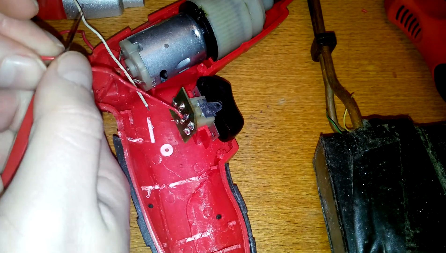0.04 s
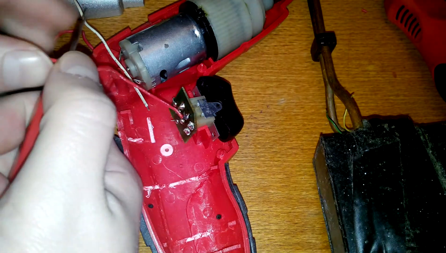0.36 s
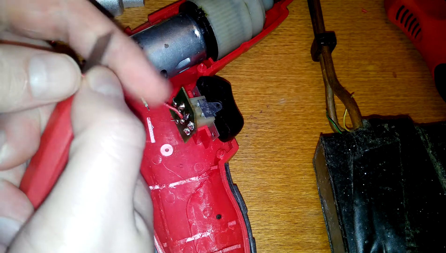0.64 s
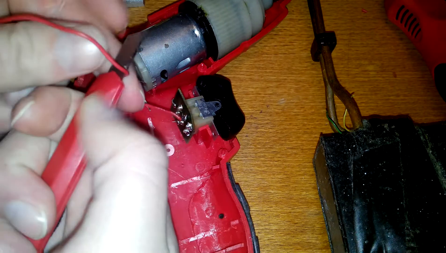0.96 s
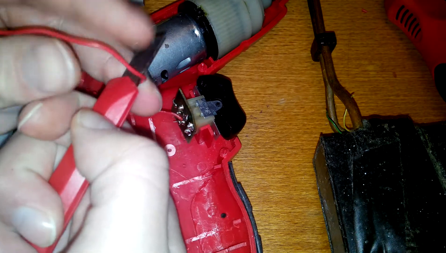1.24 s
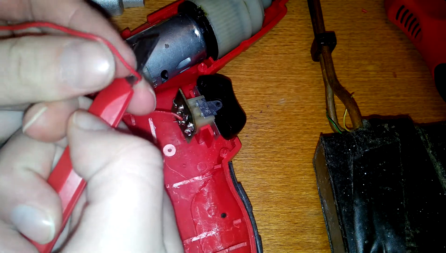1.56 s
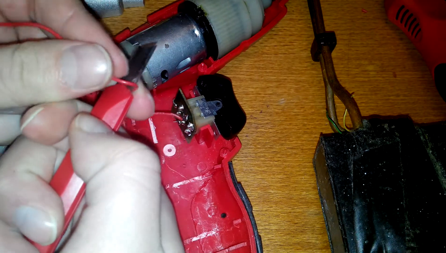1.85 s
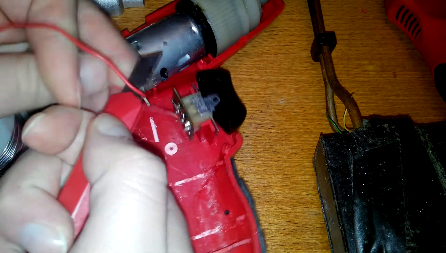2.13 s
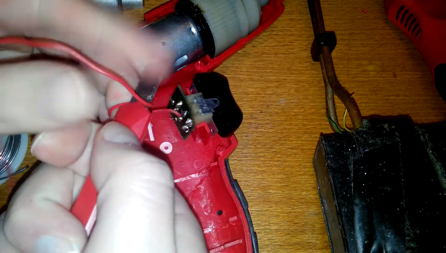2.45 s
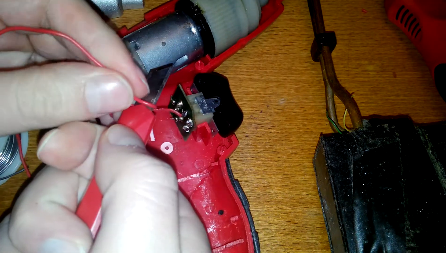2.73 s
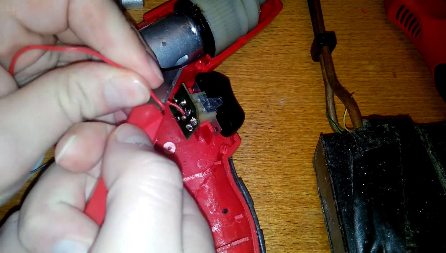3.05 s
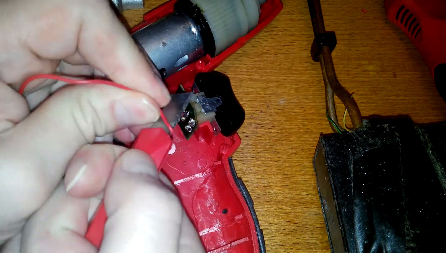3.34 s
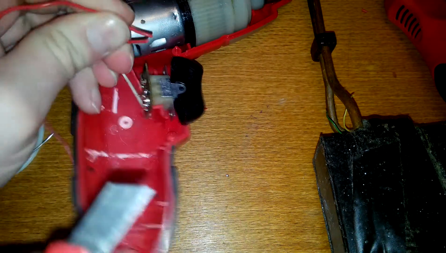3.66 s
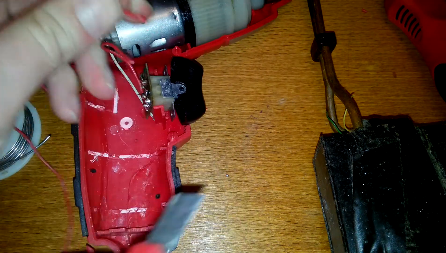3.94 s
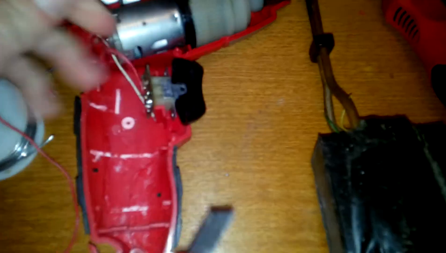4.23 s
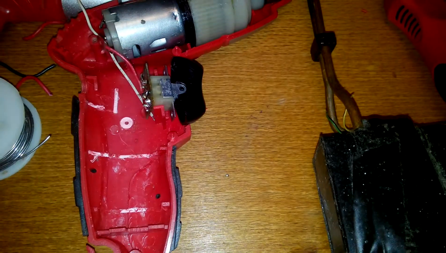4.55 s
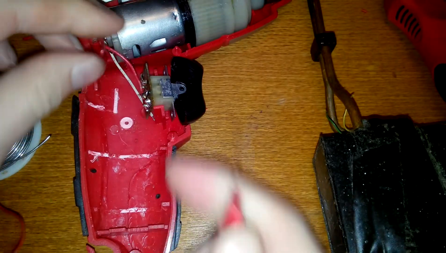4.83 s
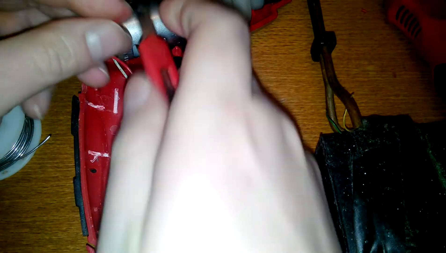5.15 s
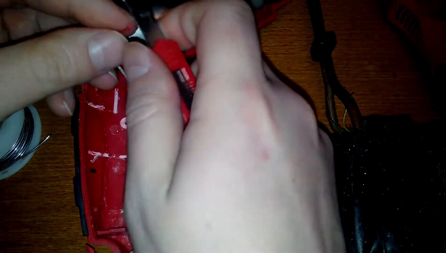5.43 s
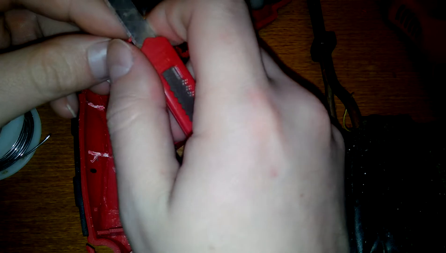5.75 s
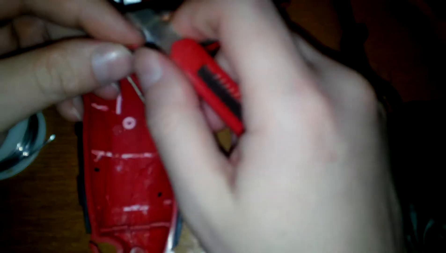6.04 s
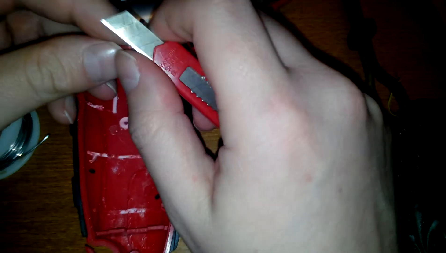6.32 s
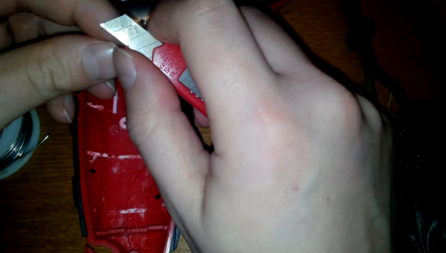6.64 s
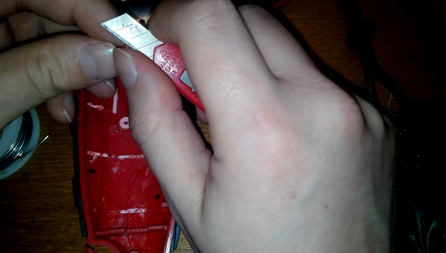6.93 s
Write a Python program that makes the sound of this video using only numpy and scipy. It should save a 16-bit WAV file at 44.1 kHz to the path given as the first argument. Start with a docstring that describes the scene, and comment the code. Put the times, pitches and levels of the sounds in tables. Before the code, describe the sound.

Thin wires and a plastic knife click faintly between fingers, with a sharp snap, hollow plastic knocks on wood and a brief blade scrape.

```python
"""Thin wires rub and tick faintly between fingers, over the soft hiss of a close microphone.
A plastic utility knife, nails and wires click over the open shell of a drill, which knocks on a wooden
table in a small quiet room. The blade snaps through a wire's insulation and the shell rocks.
At the end the blade scrapes along a wire. Hits are noise bursts plus damped modes; friction is tiny slips."""
import sys
import numpy as np
from scipy import signal
from scipy.fft import rfft, irfft
from scipy.io import wavfile

SR = 44100
rng = np.random.default_rng(int(sys.argv[2]) if len(sys.argv) > 2 else 0)


def wav_record(signal):
    """Record a signal, one row per channel, as 16-bit PCM in the file named by sys.argv[1]."""
    frames = np.transpose(np.atleast_2d(signal))
    bounded = np.clip(frames, -1, 1)
    # unit amplitude maps onto the largest positive 16-bit level
    quanta = np.round(bounded * 32767).astype(np.int16)
    wavfile.write(sys.argv[1], SR, quanta)


N = 316770
T = np.arange(8192) / SR  # time axis of one hit
HZ = np.fft.rfftfreq(len(T), 1 / SR) + 1

# wires sliding through fingers: start_s, length_s, level_db, tilt_db_per_octave
WIRE_SLIDES = [(0.312, 0.13, -71.5, -3), (1.013, 0.17, -67.5, -2), (2.186, 0.1, -56.5, -3),
               (2.34, 0.1, -73, -7), (3.36, 0.21, -77.5, -4.5), (3.633, 0.12, -48.5, -13),
               (3.784, .08, -66, -9.5), (4.003, 0.074, -67.5, 7.5), (4.237, 0.042, -66.5, -9.5),
               (4.455, 0.071, -64.5, 1.5), (4.683, 0.058, -58, 13.5), (4.846, 0.04, -63.5, -13),
               (5.252, 0.097, -69.5, -3.5), (5.591, 0.07, -73, -2)]
# spectrum of small parts touching: freq_hz, gain_db
CONTACT_SPECTRUM = [(100, -11.5), (250, -2), (900, -10), (1500, -2), (2300, 2), (4500, -1.5), (7000, -7.5),
                    (16000, -11.5)]


def amp(db):
    """Decibels to gain."""
    return 10 ** (np.asarray(db) / 20)


def unit(x):
    """Scale to unit energy."""
    return x / np.sqrt(np.sum(x ** 2) + 1e-30)


def lookup(points, hz):
    """Interpolate a table over log frequency."""
    freq_hz, value = np.transpose(points)
    return np.interp(np.log(hz + 1), np.log(freq_hz), value)


def add(mix, start_s, sound):
    """Mix in place at start_s."""
    part = mix[round(start_s * SR):][:len(sound)]
    part += sound[:len(part)]


def colour(x, gain_db):
    """Minimum-phase filter, gain_db over HZ: attacks stay sharp."""
    log_gain = np.log(amp(np.concatenate([gain_db, gain_db[-2:0:-1]])))
    response = np.exp(np.conj(signal.hilbert(log_gain)))
    taps = np.fft.ifft(response).real[:len(T) // 2]
    return signal.fftconvolve(x, taps)[:len(x)]


def tilt(db_per_octave):
    """Treble slope in dB: zero at 3 kHz, flat below 1 kHz."""
    return db_per_octave * np.log2(np.maximum(HZ, 1000) / 3000)


def decay(t60_s):
    """Envelope falling 60 dB in t60_s."""
    return np.exp(-np.log(1000) * T / max(t60_s, 1e-3))


def ring(modes, stretch=1):
    """Damped sines of a struck body; stretch scales the decay times."""
    return unit(sum(amp(db) * decay(t60_s * stretch) * np.sin(2 * np.pi * hz * T)
                    for hz, db, t60_s in modes))


def clatter(t60_s, tick_db, rise_s=0.00027):
    """Contact impulse, then modes too dense to resolve."""
    dense_modes = rng.standard_normal(len(T)) * decay(t60_s) * (1 - np.exp(-T / rise_s))
    return amp(tick_db) * (T == 0) + unit(dense_modes)


def at_level(hit, level_db):
    """Give a hit the energy of 5 ms at level_db."""
    return amp(level_db) * np.sqrt(.005 * SR) * unit(hit)


def slips(samples, rate_per_s, spread_db, rush_db):
    """Friction at unit rms: tiny uneven slips over a smooth rush."""
    sizes = amp(spread_db * np.minimum(rng.exponential(1, samples), 4))
    grains = sizes * rng.choice([-1, 1], samples) * (rng.random(samples) < rate_per_s / SR)
    rush = amp(rush_db) * unit(rng.standard_normal(samples))
    return np.sqrt(samples) * unit(unit(grains) + rush)


def hiss(rms_db=-70):
    """Steady noise of room and microphone."""
    # noise spectrum: freq_hz, relative_density_db
    density = [(15, -38.5), (25, -20.5), (107, -3.5), (141, -3.5), (291, -4), (361, -5), (587, -6),
               (905, -9), (981, -9.5), (2730, -13.5), (4570, -15.5), (6310, -19.5), (7830, -33.5),
               (13400, -32.5), (15800, -36.5)]
    gain = amp(lookup(density, np.fft.rfftfreq(N, 1 / SR)))
    noise = irfft(rfft(rng.standard_normal(N)) * gain, N)
    return amp(rms_db) * np.sqrt(N) * unit(noise)


def wire_rubs(peak_hz=3000, peak_db=4):
    """Insulation drags over skin and plastic in short swelling strokes."""
    out = np.zeros(N)
    body_db = lookup(CONTACT_SPECTRUM, HZ) + peak_db * np.exp(-(2 * np.log2(HZ / peak_hz)) ** 2)
    for start_s, length_s, level_db, slope in WIRE_SLIDES:
        samples = round(length_s * SR)
        friction = slips(samples, rate_per_s=4000, spread_db=6, rush_db=-7)
        rub = np.sqrt(samples) * unit(colour(friction, body_db + tilt(slope)))
        swell = np.sqrt(np.hanning(samples))
        add(out, start_s, amp(level_db) * rub * swell)
    return out


def click(pitch_hz, ring_db, slope, ring_t60_s=0.012, rise_s=0.0005):
    """Small parts touch: quick clatter, fainter tail, two modes damped by the grip."""
    strike = clatter(t60_s=.022, tick_db=-6.5) + amp(-7) * clatter(t60_s=.067, tick_db=-21)
    bass_cut_db = -9 / (1 + (1.36 * HZ / pitch_hz) ** 10)  # weak radiation below the first mode
    contact = unit(colour(strike, lookup(CONTACT_SPECTRUM, HZ) + tilt(slope) + bass_cut_db))
    modes = [(pitch_hz, 0, ring_t60_s), (pitch_hz * 1.3, -1, ring_t60_s * 0.39)]
    return contact + amp(ring_db) * unit(ring(modes) * (1 - np.exp(-T / rise_s)))


def finger_ticks(centre_hz=3095, spread_octaves=.4, spread_db=2.5, catch_every_s=.028):
    """Faint random ticks as fingers regrip and sliding wires catch, firmest in mid-span."""
    # start_s, length_s, level_db, tilt_db_per_octave, count
    regrip = (2.3, 4.7, -68, -2.5, 8)
    catches = [(start_s, length_s, level_db + 2, slope, int(length_s / catch_every_s))
               for start_s, length_s, level_db, slope in WIRE_SLIDES]
    out = np.zeros(N)
    for start_s, length_s, level_db, slope, count in [regrip] + catches:
        for k, (jitter, detune, force) in enumerate(rng.uniform(-0.9, 1, (count, 3))):
            progress = (k + .5 + .5 * jitter) / count
            tick = click(centre_hz * 2 ** (spread_octaves * detune), ring_db=-7, slope=slope)
            tick = at_level(tick, level_db + spread_db * force)
            add(out, start_s + length_s * progress, np.sin(np.pi * progress) * tick)
    return out


def handling_clicks():
    """Distinct contacts of knife, nails and wires; the grip shifts their pitch."""
    # contacts: start_s, level_db, pitch_hz, ring_over_clatter_db, tilt_db_per_octave
    contacts = [ (0.874, -65.5, 2470, -14, -3), (1.088, -61, 4320, 0, -7), (1.114, -61.5, 3900, 2, -6),
                (1.125, -60, 1700, -6, -3), (1.203, -57.5, 2250, -7, 2.5), (2.0875, -53.5, 3580, -1, 0),
                (2.186, -41, 2670, 4, -0.5), (2.2046, -53, 2640, 2, -3), (2.2533, -42.5, 3250, 1.5, 0),
                (2.3237, -53, 2280, -11, -3), (2.4208, -47, 2520, 15, -15), (2.4332, -36.5, 2380, 4, -9.5),
                (2.4405, -54, 2370, -2, 3), (2.740, -53, 2500, -2, -4.5), (2.847, -62.5, 2960, 3, -7),
                (2.864, -64, 2500, -1, -7), (3.108, -50, 1810, -2, -8), (3.1164, -43, 2340, 5, -4.5),
                (3.3768, -58, 2100, -5, 2.5), (3.4024, -59, 2080, -3, -0.5), (3.45, -59, 2500, -3, -7),
                (3.4804, -59, 2330, -3, -16), (3.4888, -59.5, 3600, -12, -4.5),
                (3.5564, -57.5, 2400, -6, -17), (3.587, -52, 2280, 9, -13), (3.6815, -36, 3700, -10, -3),
                (3.7255, -28.5, 2220, -1.5, -10.5), (3.7402, -36, 2240, -13, -1.5),
                (3.791, -50.5, 2096, -5, 9), (3.8925, -61, 2490, 0, -4), (4.249, -49.5, 1670, -23, 12.5),
                (4.5313, -58.5, 3510, -20, 1), (4.6857, -51.5, 1560, -5.5, 6.5),
                (4.701, -46, 3900, -16.5, 14.5), (4.8213, -61, 905, -1, -11),
                (4.8521, -53.5, 3800, -5, 4.5), (4.891, -62, 3020, -17, 1.5), (5.082, -64, 4500, -16, 0),
                (5.096, -59.5, 3290, -21, -5), (5.162, -56, 2070, 2, -8), (5.191, -49, 2080, -7.5, 11.5),
                (5.3097, -54.5, 2770, -24, 0.5), (5.3452, -53, 2020, -9, 4), (5.4343, -50.5, 2050, 6, -1.5),
                (5.482, -64.5, 2060, 10, -5), (5.555, -47.5, 3000, -8, -7), (6.0332, -42.5, 3980, -17, 9.5),
                (6.053, -44.5, 2360, -2, 6), (6.06, -43.5, 4900, -15, 6), (6.143, -42, 2050, 8, 4),
                (6.1615, -49.5, 2340, -6, 4), (6.189, -52, 2520, -8, 0)]
    out = np.zeros(N)
    for start_s, level_db, pitch_hz, ring_db, slope in contacts:
        add(out, start_s, at_level(click(pitch_hz, ring_db, slope), level_db))
    return out


def shell_knocks(ring_db=2.5, lift_octaves=0.14, full_blow_db=-21, db_per_doubling=43.5):
    """Hollow shell on wood: heavy blows reach low modes, hard ones high; the spot hit lifts one."""
    # blows: start_s, level_db, low_cut_hz, high_cut_hz, lift_hz, lift_db
    blows = [(2.2694, -52.5, 170, 1800, 830, 6), (2.4208, -27, 404, 1590, 412, 2),
             (3.5085, -38, 129, 440, 302, 18), (3.5150, -40, 129.5, 380, 565, 15),
             (3.629, -40, 132, 380, 196, 8), (3.6814, -23.5, 165.5, 750, 569, 13),
             (3.71, -34.5, 149, 600, 288, 13), (3.7247, -21.5, 250, 3200, 1218, 9.5),
             (3.7545, -38, 240, 500, 440, 14), (5.5537, -43, 910, 4000, 1240, 11.5),
             (6.038, -45.5, 697, 3500, 980, 12), (6.1393, -43, 220, 2600, 520, 1)]
    # shell resonances: freq_hz, gain_db, base_t60_s
    shell_modes = [(122, -11.5, 0.091), (193.5, -6, 0.11), (280, -12.5, .09), (388.6, -1.5, 0.13),
                   (418.5, 3.5, 0.076), (520, -4, 0.085), (597, -3.5, 0.047), (668, 2.5, 0.042),
                   (743, 1, 0.055), (810, -5, 0.032), (865, 4, 0.047), (980, -13, 0.11),
                   (1090, -12.5, 0.059), (1240, -2.5, 0.052), (1425, -15.5, 0.052), (1700, -4, 0.04),
                   (1973, -26.5, 0.02), (2280, -5.5, .045)]
    # spectrum of the shell's dense modes: freq_hz, gain_db
    shell_spectrum = [(50, -20.5), (150, 2), (400, -10.5), (1000, 4), (1600, -3), (2300, -3), (4000, -7),
                      (7000, -10.5), (16000, -22)]
    out = np.zeros(N)
    for start_s, level_db, low_hz, high_hz, lift_hz, lift_db in blows:
        # stronger blows free the shell from the hand and ring longer
        stretch = 1.11 * 2 ** ((level_db - full_blow_db) / db_per_doubling)
        strike = clatter(t60_s=0.045 * stretch, tick_db=-6.5)
        body = unit(colour(strike, lookup(shell_spectrum, HZ)))
        body += amp(ring_db) * ring(shell_modes, stretch)
        force_db = -10 * np.log10((1 + (low_hz / np.maximum(HZ, 20)) ** 4) * (1 + (HZ / high_hz) ** 2))
        spot_db = lift_db / (1 + (np.log2(HZ / lift_hz) / lift_octaves) ** 2)
        add(out, start_s, at_level(colour(body, force_db + spot_db), level_db))
    return out


def blade_snap(tail_db=-3):
    """The blade bites, breaks through insulation and chatters in its handle, ringing the knife."""
    # cracks: start_s, level_db, tilt_db_per_octave, ring_over_crack_db
    cracks = [(3.6150, -28.5, -2, -7), (3.6164, -18, 2.7, -0.5), (3.632, -32, 4.5, -15),
              (3.6385, -44, 1.5, -13), (3.6408, -39, -9.5, -15)]
    # knife resonances: freq_hz, gain_db, t60_s
    knife_modes = [(2080, -7, 0.064), (2240, 11, 0.045), (2500, -12.5, .04), (2614, -1, 0.046),
                   (2690, 13.5, 0.025), (2920, 1, .022), (3360, -4, 0.056), (3700, -10.5, .025),
                   (3960, -14, 0.04), (4450, 0, 0.05), (4660, -4, 0.056), (4830, -10, 0.053),
                   (5200, -11, 0.016), (5340, -17, 0.041), (5940, -17, 0.026), (6500, -16, 0.073),
                   (7500, -14, 0.043)]
    # spectrum of the crack: freq_hz, gain_db
    knife_spectrum = [(80, -35), (200, -22), (800, -25.5), (1650, -15), (1900, 5.5), (2150, 6), (2800, -3),
                      (3400, -2.5), (5500, -7), (8000, -13.5), (12000, -10), (16000, -11.5)]
    out = np.zeros(N)
    for start_s, level_db, slope, ring_db in cracks:
        crack = unit(clatter(t60_s=.004, tick_db=6))
        tail = amp(tail_db) * unit(clatter(t60_s=.043, tick_db=-30))
        strike = unit(colour(crack + tail, lookup(knife_spectrum, HZ)))
        snap = colour(strike + amp(ring_db) * ring(knife_modes), tilt(slope))
        add(out, start_s, at_level(snap, level_db))
    return out


def rasp(envelope, wire_db, wire_hz=925, wire_t60_s=0.019):
    """The edge sticks and slips along insulation; the taut wire rings with it."""
    # spectrum of the scraping edge: freq_hz, gain_db
    edge_spectrum = [(60, -6), (130, -1), (400, -1), (650, -5), (950, 2.5), (1300, 1), (1800, 0),
                     (2500, -3), (3100, -8), (6500, -14.5), (16000, -21)]
    samples = len(envelope)
    friction = slips(samples, rate_per_s=1500, spread_db=3, rush_db=-2)
    edge = unit(colour(friction, lookup(edge_spectrum, HZ)))
    wire = unit(signal.fftconvolve(friction, ring([(wire_hz, 0, wire_t60_s)]))[:samples])
    return envelope * np.sqrt(samples) * unit(edge + amp(wire_db) * wire)


def blade_scrape(peak_s=6.15, peak_db=-49, hold_s=0.039, swell_db_per_s=143, release_db_per_s=163):
    """One pull along the wire: pressure swells, holds and lets go, surging where the edge digs in."""
    # edge digs in and jerks free: start_s, level_db, wire_over_edge_db
    digs = [(6.055, -45, 2), (6.141, -45, -6), (6.16, -51, 8), (6.184, -47, -7), (6.209, -49, 10),
            (6.279, -57.5, -7), (6.308, -64, -4)]
    out = np.zeros(N)
    t = np.arange(-.2, .3, 1 / SR)
    drop_db = swell_db_per_s * np.maximum(-t, 0) + release_db_per_s * np.maximum(t - hold_s, 0)
    add(out, peak_s + t[0], rasp(amp(peak_db - drop_db), wire_db=-11))
    surge = np.minimum(T / 0.0068, 1) * decay(t60_s=.11)  # 6.8 ms rise
    for start_s, level_db, wire_db in digs:
        add(out, start_s, rasp(amp(level_db) * surge / surge.max(), wire_db))
    return out


def room(x, build_s=0.0051):
    """Diffuse tail, each band dying at its own rate."""
    # reverberation time: freq_hz, t60_s
    band_t60 = [(100, 0.67), (400, 0.1056), (2200, 0.17), (7000, 0.22), (16000, 0.21)]
    hz, t, bands = signal.stft(rng.standard_normal(SR // 2), SR, nperseg=256)
    fade = np.exp(-np.log(1000) * t / lookup(band_t60, hz)[:, None])
    tail = signal.istft(bands * fade, SR)[1]
    tail *= 1 - np.exp(-(np.arange(len(tail)) / SR / build_s) ** 2)
    return signal.fftconvolve(x, unit(tail))[:N]


def scene():
    """Close handling plus a little room, mono."""
    near = handling_clicks() + blade_snap() + shell_knocks()
    near = near + wire_rubs() + blade_scrape() + finger_ticks()
    return (near + amp(-13.5) * room(near))[None]


def record(dry):
    """Microphone colour, hiss and a 15.9 kHz band limit."""
    # microphone response, weak in the top octave: freq_hz, gain_db
    mic_response = [(25, -15), (70, -24), (110, -5), (6000, 1.5), (7250, -4), (7700, -19.5), (8200, -25),
                    (9500, -15.5), (11000, -12.5), (12500, -13.5), (13400, -33), (15000, -18.5),
                    (16300, -29.5)]
    heard = colour(dry[0], lookup(mic_response, HZ)) + hiss()
    band_limit = signal.firwin(511, 15900, window=("kaiser", 9), fs=SR)
    return signal.oaconvolve(heard, band_limit, "same")[None]


dry = scene()
out = record(dry)
wav_record(out)
```